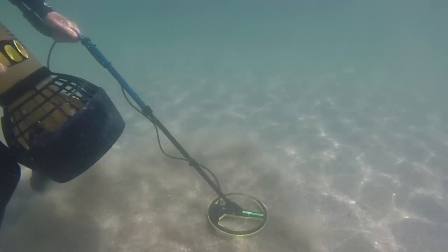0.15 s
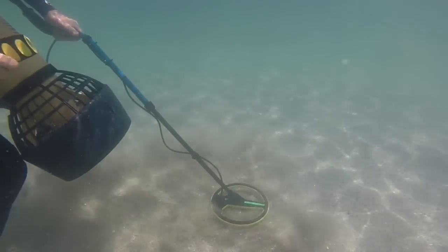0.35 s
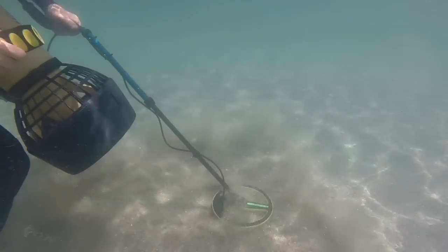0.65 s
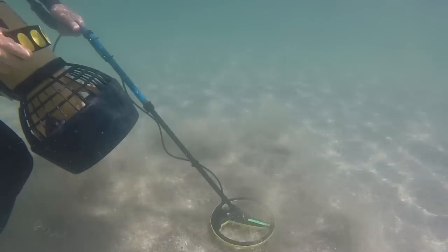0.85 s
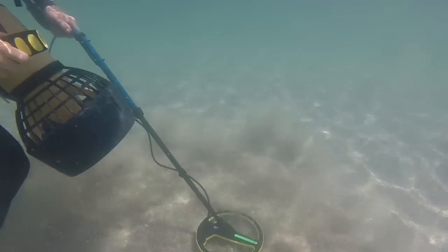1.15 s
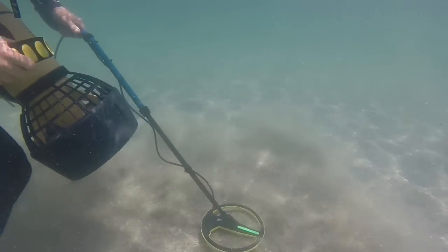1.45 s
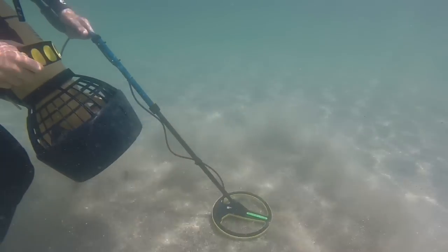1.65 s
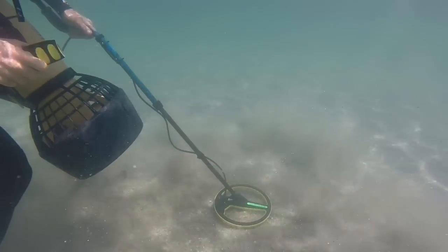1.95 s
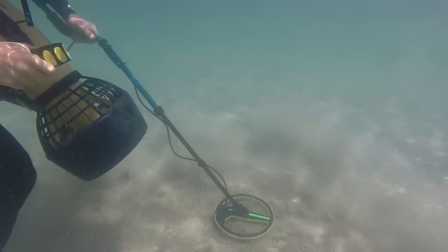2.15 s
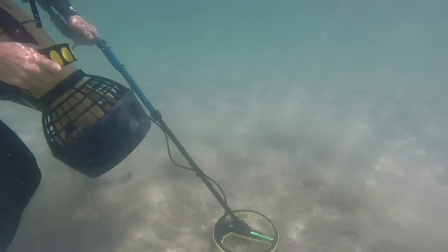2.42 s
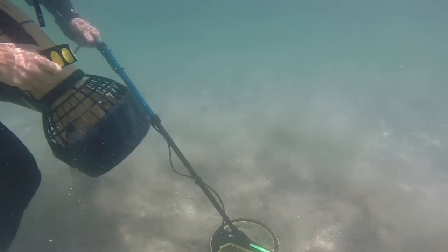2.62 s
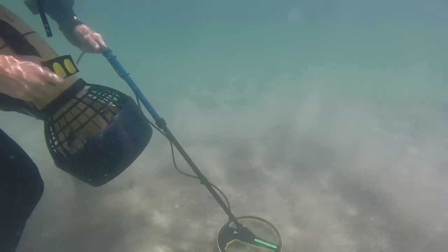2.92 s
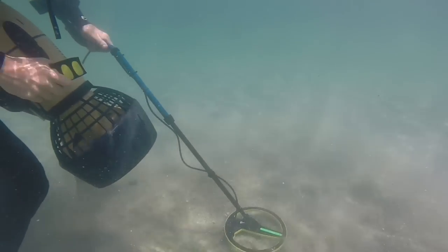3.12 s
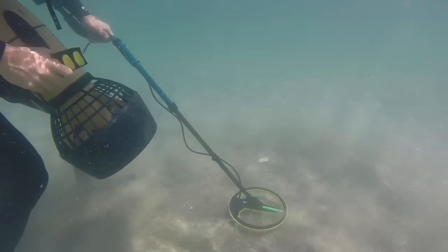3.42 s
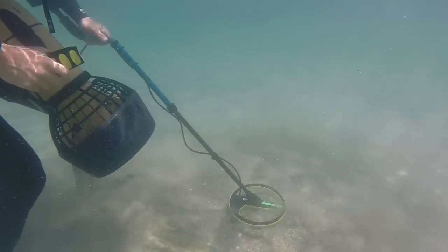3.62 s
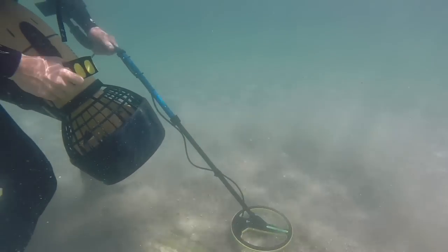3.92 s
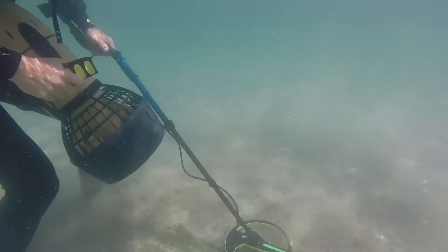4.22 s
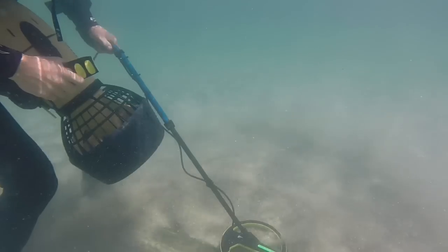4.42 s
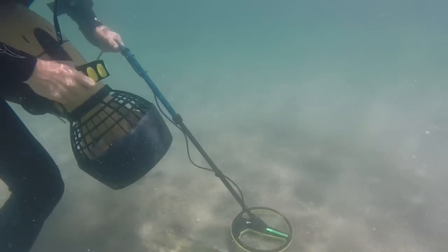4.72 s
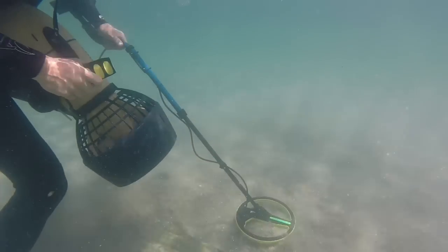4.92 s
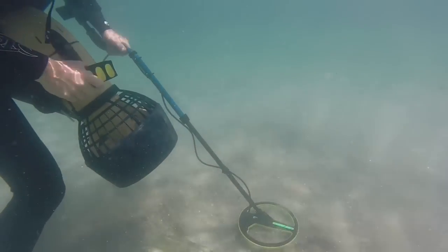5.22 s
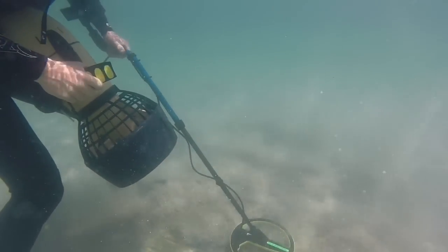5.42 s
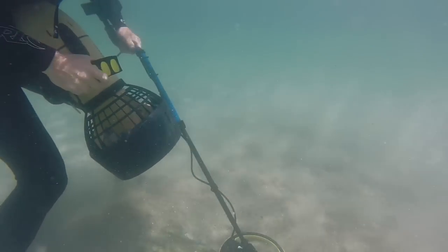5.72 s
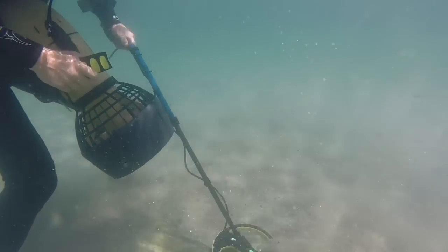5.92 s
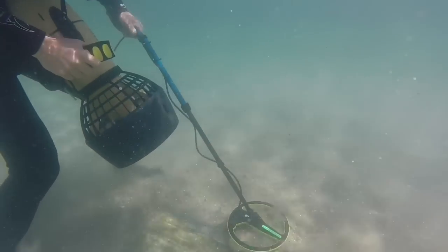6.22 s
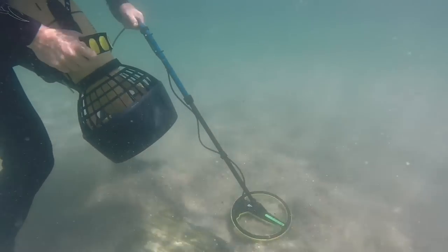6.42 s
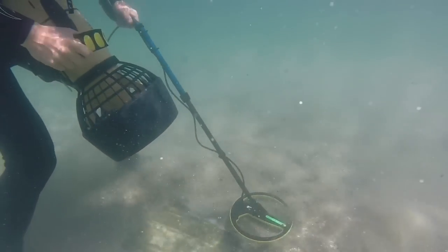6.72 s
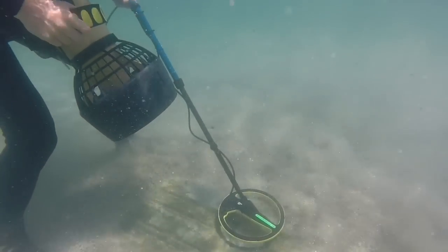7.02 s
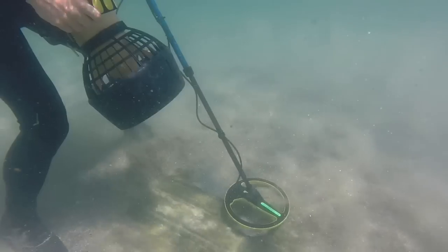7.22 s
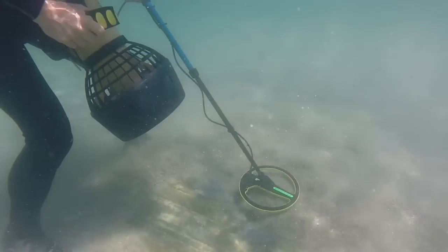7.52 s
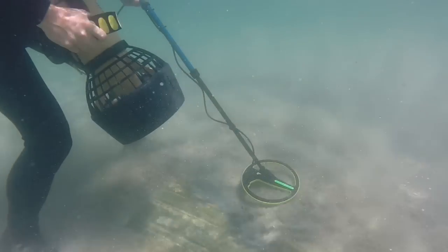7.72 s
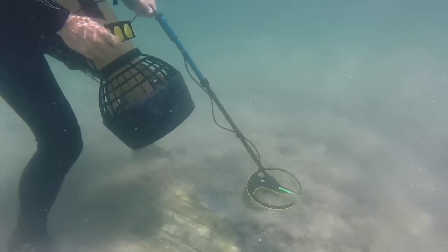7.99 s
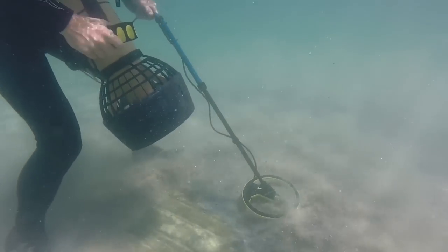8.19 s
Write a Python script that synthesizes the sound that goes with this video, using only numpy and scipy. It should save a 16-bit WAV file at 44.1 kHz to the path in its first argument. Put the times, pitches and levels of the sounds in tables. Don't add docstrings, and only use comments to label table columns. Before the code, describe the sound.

Under shallow water over sand, an electric scooter held by a diver runs steadily throughout: dense, dry plastic rattle, midrange gear whine and quick soft knocks about seven per second. A cluster of low thumps lands just after three seconds, a few more near five, then stronger rumbling and thumps between six and eight. A close camera in a sealed housing hears it from about a metre, with no echo.

```python
import sys
import numpy as np
from scipy import signal
from scipy.fft import rfft, irfft, next_fast_len
from scipy.io import wavfile
from scipy.ndimage import uniform_filter1d

SR = 44100
rng = np.random.default_rng(int(sys.argv[2]) if len(sys.argv) > 2 else 0)


def transcribe(u):
    v = np.clip(np.atleast_2d(u).T, -1, 1)
    q = np.round(v * 32767).astype(np.int16)
    wavfile.write(sys.argv[1], SR, q)


def ratio_of_db(decibels):
    return 10 ** (np.asarray(decibels, float) / 20)


N = 368235

PROP_HZ, CARRIER_HZ, PLANET_HZ, MOTOR_HZ = 7.11, 20.1, 131.3, 151.5
T = np.arange(N) / SR
TURN = PROP_HZ * T
SIZE = next_fast_len(N + SR // 4)
HZ = np.arange(SIZE // 2 + 1) * SR / SIZE + 1e-3

# peak time in seconds, peak level in dB, fade in seconds.
GUSTS = [
    (3.28, -58, .6),
    (5.3, -50, 1.0),
    (6.4, -51, .3),
    (6.8, -48, .3),
    (7.2, -45.5, .4),
]
# time in seconds, peak in dB, ring in Hz, push (+) or pull (-).
EDDY_THUMPS = [(3.217, -41, 45, -1), (3.279, -29, 140, -1), (3.284, -33, 110, 0.81), (3.285, -34, 200, 1),
               (3.3, -36, 60, -1.1), (5.08, -37, 45, -1.1), (5.43, -43, 45, -1), (6.37, -35, 45, -1),
               (6.66, -34, 37, 0.87), (6.712, -30, 38, -1), (6.745, -36, 13, 1), (6.79, -38, 12, -1),
               (6.9, -38, 14, 1), (6.94, -40, 16, -1), (7.163, -32, 59, -1), (7.18, -36, 25, 1),
               (7.232, -34, 68, 0.89), (7.253, -31, 47, -1.4), (7.74, -35, 53, -1)]
# multiple of the shaft rate, level in dB.
MOTOR_ORDERS = [(1, -52), (4, -60), (5, -39), (6, -46.5)]
# multiple of the planet rate, level in dB.
PLANET_ORDERS = [(1, -60), (2, -66), (4, -64)]
# frequency in Hz, level in dB, loudest angle in turns,
# second swell angle in turns, swing in dB.
MESH_TONES = [(686, -50.5, .95, .5, 3), (945, -49, .45, .8, 4), (1003, -50, .1, .4, 4),
              (1444, -51, .7, .2, 3), (1576, -48.5, .63, .3, 6), (1673, -47, .25, .05, 6),
              (1837, -45, .8, .1, 3), (973, -44, .1, .85, 5), (1338, -56, .5, .1, 2),
              (2361, -54.5, .3, .8, 3), (3030, -56, .6, .2, 8), (3155, -52.5, .2, .6, 12),
              (4604, -61, .66, .2, 12), (4720, -63, .2, .78, 10), (6180, -60, .18, .45, 8),
              (7760, -71, .4, .7, 6)]
# multiple of the propeller turn, level in dB.
LAST_STAGE_TEETH = [(33, -65), (36, -62), (41, -67), (44, -62), (55, -63), (94, -55), (96, -53), (97, -51)]
# angle in turns, ring in Hz, 60 dB decay in seconds, level in dB.
TURN_KNOCKS = [
    (.83, 335, .05, -40),
    (.36, 312, .08, -43),
    (.24, 300, .07, -46),
    (.56, 380, .04, -45),
]
# frequency in Hz, width in Hz, level in dB.
HULL_MODES = [(129, 67, -21.6), (289, 209, -28.4), (454, 61, -30.6), (642, 217, -20.8), (673, 42, -20.0),
              (787, 142, -15.1), (935, 146, -16.2), (998, 119, -19.1), (1181, 169, -30.8),
              (1333, 47, -27.7), (1418, 159, -22.1), (1596, 26, -23.6), (1647, 59, -23.9),
              (1743, 219, -14.5), (1875, 50, -19.7), (1952, 237, -18.4), (2289, 303, -27.0),
              (2646, 327, -28.4), (3109, 500, -30.9), (3417, 265, -29.6), (3896, 711, -30.6),
              (4366, 276, -36.8), (4764, 493, -39.1), (5271, 351, -41.5), (6005, 679, -39.9),
              (6923, 482, -43.8), (8228, 2210, -45.6), (10833, 2253, -52.7), (12917, 1104, -60.2),
              (14691, 1201, -63.4)]
# frequency in Hz,
# width in Hz, gain in dB.
PATH_INTERFERENCE = [(6550, 90, -3), (9150, 250, 1.7), (9600, 200, -2.5), (10050, 200, 1.5),
                     (10500, 200, -3), (11100, 400, 1.5), (13800, 150, -4)]
# angle in turns, length in
# turns, frequency in Hz, width in octaves, level in dB over the rattle.
TIGHT_SPOTS = [(0.073, 0.068, 12320.0, 0.28, 8.7), (0.375, 0.088, 8370.0, 0.11, 9.0),
               (0.3, 0.095, 9830.0, 0.13, 4.9), (0.538, 0.046, 10570.0, 0.39, 1.4),
               (0.631, 0.1, 13320.0, 0.17, 5.2), (0.771, 0.035, 10560.0, 0.16, 6.0),
               (0.745, 0.061, 8380.0, 0.11, 5.6), (0.323, 0.066, 5660.0, 0.09, 5.2),
               (0.776, 0.106, 4980.0, 0.15, 4.9), (0.038, 0.052, 4140.0, 0.24, 4.3),
               (0.207, 0.06, 3080.0, 0.62, 2.2), (0.788, 0.122, 3960.0, 0.15, 3.5),
               (0.347, 0.115, 13500.0, 0.25, 3.9), (0.132, 0.1, 8650.0, 0.08, 4.3),
               (0.58, 0.096, 9420.0, 0.25, 2.5), (0.818, 0.074, 12150.0, 0.25, 1.1),
               (0.2, 0.07, 1700, 0.2, -4), (0.12, 0.07, 1000, 0.12, -4), (0.95, 0.04, 750, 0.3, -3),
               (.095, .015, 12800, .25, 8.1), (.33, .015, 11500, .3, 4.5), (.57, .015, 11500, 0.28, 6),
                (.79, .012, 11000, .2, 5.5)]
# time in seconds, share of the full swing 0 to 1.
HULL_BEARING = [(0, 0.03), (.6, 0.18), (.9, 0.16), (2.8, 0.03), (3.2, 0.1), (3.7, 0.13), (5.2, 0.05),
                (5.9, 0.34), (6.7, 0.6), (7.2, 0.9), (8.35, 0.87)]
# frequency in Hz, gain in dB.
SWING_COLOUR = [(2000, 1), (2600, -3.5), (3100, 3.5), (4600, -4.5), (5400, -1.5), (5750, -7), (6150, 1),
                (6550, -1), (7400, 3.5), (8500, -1.5), (9600, -11), (10400, -1), (11000, -1), (15000, 1)]
# time in seconds, distance in m.
HULL_DISTANCE = [(0, 1.03), (.6, .97), (1.6, .96), (2.7, 1.04), (4.2, 1.04), (5.5, 1.035), (6.2, 0.98),
                 (6.9, 0.94), (8.35, 1.006)]
# top edge in Hz, gain in dB once swung toward the camera,
# swing in dB as the grip rocks.
HULL_PANELS = [(420, -0.3, 0.3), (1260, 1.2, 0), (5500, -0.46, 0.3), (9700, 6.5, 2.5), (13800, -1.3, .5),
               (22000, 4, 2.2)]


def unit(x):
    return x / np.sqrt(np.mean(x ** 2))


def walk(rate):
    hold = int(SR / rate)
    steps = np.repeat(rng.standard_normal(N // hold + 1), hold)
    return unit(uniform_filter1d(uniform_filter1d(steps, hold), hold)[:N])


def spot(angle, length):
    from_centre = (TURN - angle + .5) % 1 - .5
    return np.exp(-.5 * (from_centre / length) ** 2)


def swell(peak_s, rise_s, fade_s):
    rise = np.exp(-.5 * ((T - peak_s) / rise_s) ** 2)
    fade = np.exp(-np.abs(T - peak_s) / fade_s)
    return np.where(T < peak_s, rise, fade)


def region(low, high):
    return 1 / (1 + (low / HZ) ** 20) - 1 / (1 + (high / HZ) ** 20)


def causal(gain):
    cepstrum = irfft(np.log(gain), SIZE)
    cepstrum[1:SIZE // 2] *= 2
    cepstrum[SIZE // 2 + 1:] = 0
    return np.exp(rfft(cepstrum))


def wash():
    flow = ratio_of_db(-57.5)
    for peak_s, db, fade_s in GUSTS:
        flow = flow + ratio_of_db(db) * swell(peak_s, .1, fade_s)
    colour = (HZ / 11) ** 2 / (1 + (HZ / 11) ** 2.8) / (1 + (HZ / 95) ** 4)
    rumble = irfft(rfft(rng.standard_normal(N), SIZE) * colour, SIZE)[:N]
    out = unit(rumble) * flow
    for start_s, db, hz, sense in EDDY_THUMPS:
        cycles = (T - start_s) * hz
        pulse = np.cos(2 * np.pi * cycles) * np.exp(-.5 * (cycles / 0.23) ** 2)
        out += sense * ratio_of_db(db + 0.5) * pulse
    return out


def tone(hz, wobble, wander_hz, rate):
    cycles = np.cumsum(hz * wobble + wander_hz * walk(rate)) / SR
    return np.sqrt(2) * np.sin(2 * np.pi * cycles)


def motor_and_planets(wobble):
    out = np.zeros(N)
    for k, db in MOTOR_ORDERS:
        out += ratio_of_db(db - 0.3 + 1.5 * walk(18)) * tone(k * MOTOR_HZ, 1 + 0.42 * wobble, .35 * k, 9)
    for k, db in PLANET_ORDERS:
        level_db = db + 8 * spot(.3, .05) + 1.5 * walk(5)
        out += ratio_of_db(level_db) * tone(k * PLANET_HZ, 1, .3, 3)
    return out


def mesh(wobble):
    out = np.zeros(N)
    for hz, db, first, second, swing_db in MESH_TONES:
        press = spot(first, 0.095) + 0.67 * spot(second, 0.12)
        strength = unit(ratio_of_db(swing_db * press + 2.1 * walk(40)))
        out += ratio_of_db(db) * strength * tone(hz, 1 + 0.71 * wobble, 0.001405 * hz, 35)
    for k, db in LAST_STAGE_TEETH:
        out += ratio_of_db(db + 1.5 * walk(4)) * tone(k * PROP_HZ, 1, .2, 2)
    return out


def knocks():
    out = np.zeros(N)
    for angle, hz, t60, db in TURN_KNOCKS:
        age = (TURN - angle) % 1 / PROP_HZ
        draws_db = 1.8 * rng.standard_normal(int(TURN[-1]) + 2)
        strength_db = draws_db[(TURN - angle + 1).astype(int)]
        ring = np.sin(2 * np.pi * hz * age) * np.exp(-np.log(1000) * age / t60)
        out += ratio_of_db(db + strength_db) * ring
    return out


def gears():
    wobble = .004 * np.cos(2 * np.pi * (TURN - .65)) + .003 * np.cos(8 * np.pi * (TURN - .19))
    return rfft(motor_and_planets(wobble) + mesh(wobble) + knocks(), SIZE)


def clicks(rate, spread_db):
    chance, size, sign = rng.random(N), rng.exponential(size=N), rng.standard_normal(N)
    hit = np.clip(rate / SR / chance, 0, 1) ** 2
    return unit(sign * ratio_of_db(spread_db * np.minimum(size, 4)) * hit)


def hull_power():
    power = 0
    for hz, width, db in HULL_MODES:
        power = power + ratio_of_db(2 * db) / (1 + ((HZ - hz) / (width / 2)) ** 4) ** 1.5
    power *= ratio_of_db(-6 * region(230, 382))
    paths_db = sum(db * np.exp(-.5 * ((HZ - hz) / width) ** 2) for hz, width, db in PATH_INTERFERENCE)
    return power * ratio_of_db(2 * paths_db)


def rattle():
    fine, coarse = clicks(14300, 1.0), clicks(4800, 4.0)
    carrier, shaft = np.cos(2 * np.pi * CARRIER_HZ * T), np.cos(2 * np.pi * MOTOR_HZ * T)
    load = unit(ratio_of_db(.6 * carrier + .9 * shaft))
    beat = unit(ratio_of_db(0.99 * np.cos(2 * np.pi * PLANET_HZ * T)))
    dull = 1 / (1 + (HZ / 5200) ** 8)
    force = rfft(load * clicks(21100, 0.84), SIZE) * np.sqrt(dull)
    edges_hz = [0, 6550, 7300, 9600, 12200, 13800, SR]
    for low, high in zip(edges_hz, edges_hz[1:]):
        clusters = unit(beat * ratio_of_db(0.59 * walk(3.24) + 1.4 * walk(60)))
        rasp = clusters * np.roll(coarse, rng.integers(N))
        force += rfft(rasp, SIZE) * np.sqrt(region(low, high) * (1 - dull))
    power = 1
    for angle, length, hz, octaves, db in TIGHT_SPOTS:
        treble = hz > 5000
        press = spot(angle, length) * ratio_of_db(db + (1.9 if treble else 1.1) * walk(11))
        hits = np.roll(coarse if treble else fine, rng.integers(N))
        if treble:
            hits = hits * beat
        band = np.exp(-.5 * (np.log2(HZ / hz) / octaves) ** 2)
        force += rfft(press * hits, SIZE) * band
        power = power + np.mean(press ** 2) * band ** 2
    return force * causal(np.sqrt(hull_power() / power))


def scene():
    machine = ratio_of_db(0.2) * rattle() + gears()
    bearing = np.clip(np.interp(T, *np.transpose(HULL_BEARING)), 0, 1)
    rock = swell(3.35, .25, 1.6) * np.cos(2 * np.pi * 1.75 * (T - 3.35))
    heard, low_hz = np.zeros(N), 0
    for top_hz, toward_db, rock_db in HULL_PANELS:
        panel = irfft(machine * region(low_hz, top_hz), SIZE)[:N]
        heard += panel * ratio_of_db(toward_db * (bearing - 0.38) + rock_db * rock)
        low_hz = top_hz
    heard /= np.interp(T, *np.transpose(HULL_DISTANCE))
    hz, db = np.transpose(SWING_COLOUR)
    swing_db = np.interp(np.log(HZ), np.log(hz), db)
    spectrum = rfft(heard, SIZE)
    away = irfft(spectrum * ratio_of_db(-.27 * swing_db), SIZE)[:N]
    toward = irfft(spectrum * ratio_of_db(.73 * swing_db), SIZE)[:N]
    return (wash() + (1 - bearing) * away + bearing * toward)[None]


def low_pass(x):
    return signal.sosfilt(signal.butter(12, 15210, fs=SR, output="sos"), x)


def record(dry):
    return low_pass(dry)


dry = scene()
out = record(dry)
transcribe(out)
```